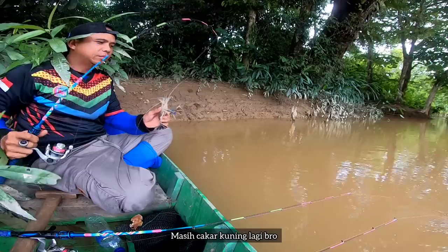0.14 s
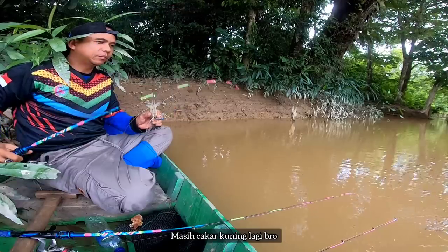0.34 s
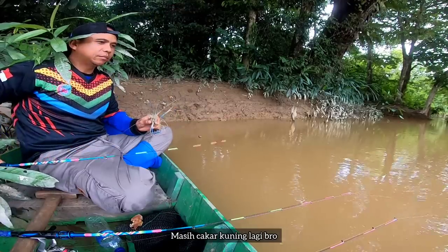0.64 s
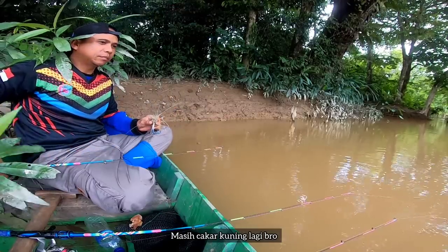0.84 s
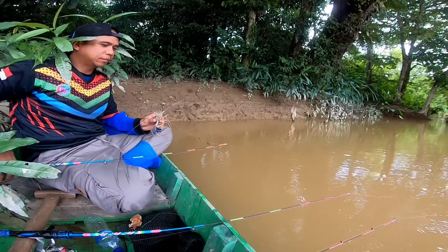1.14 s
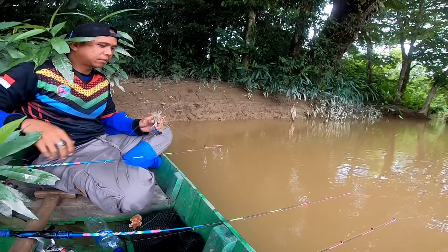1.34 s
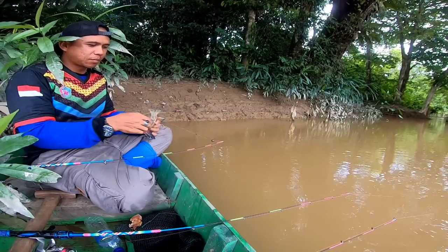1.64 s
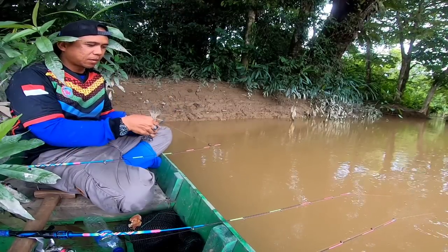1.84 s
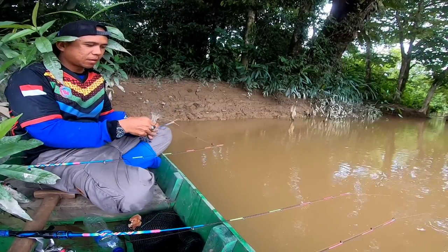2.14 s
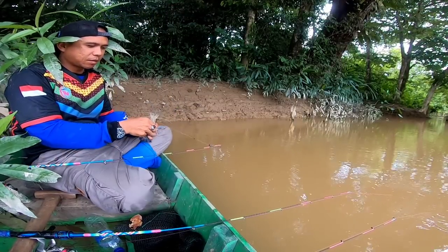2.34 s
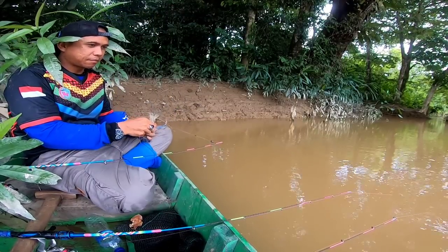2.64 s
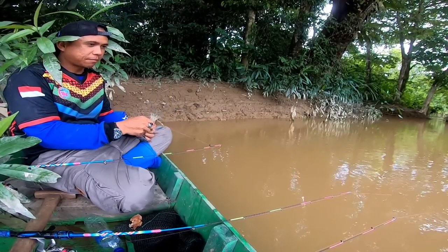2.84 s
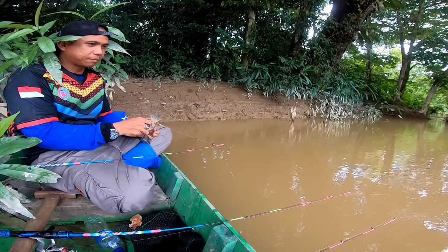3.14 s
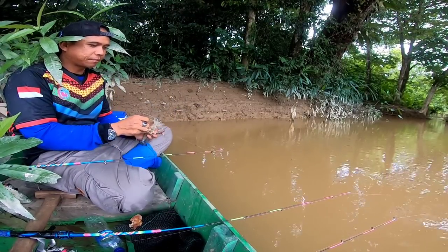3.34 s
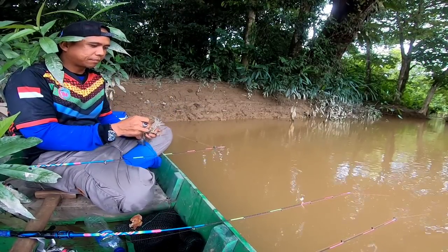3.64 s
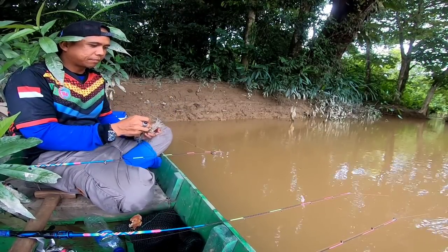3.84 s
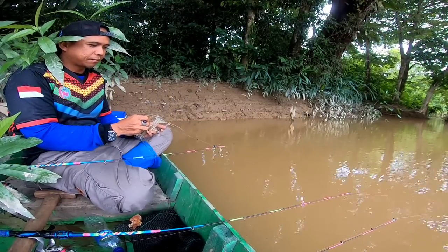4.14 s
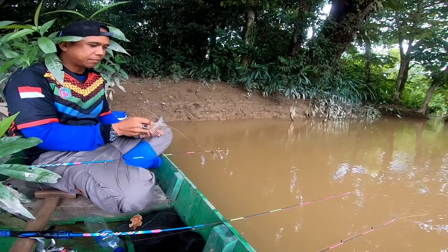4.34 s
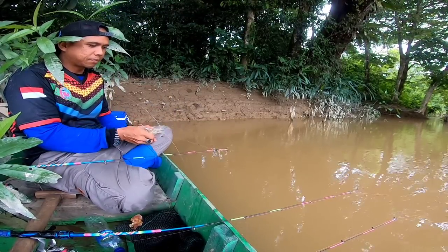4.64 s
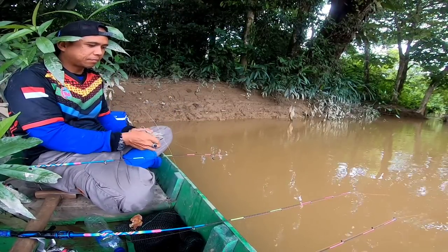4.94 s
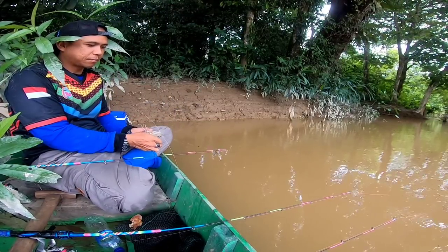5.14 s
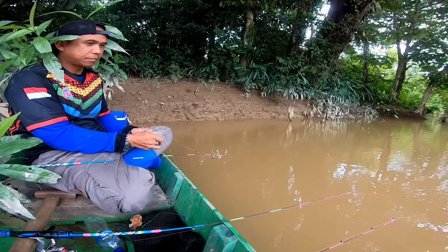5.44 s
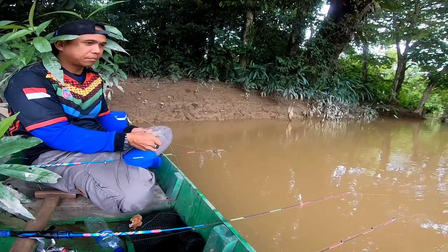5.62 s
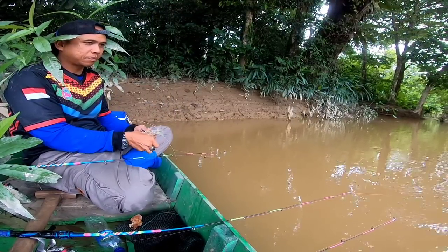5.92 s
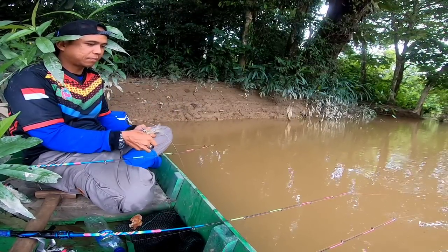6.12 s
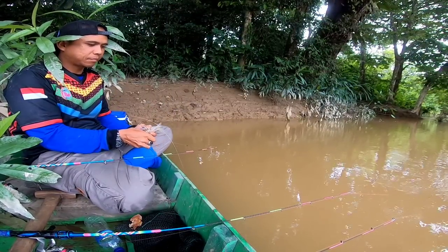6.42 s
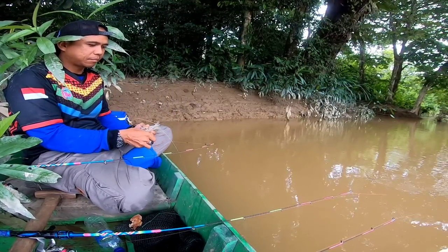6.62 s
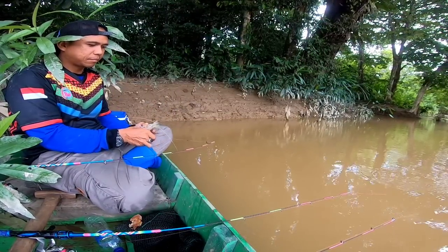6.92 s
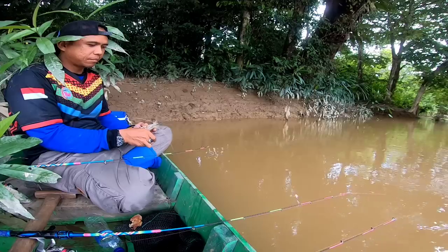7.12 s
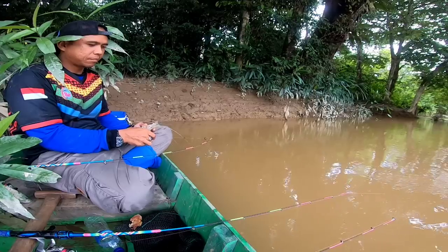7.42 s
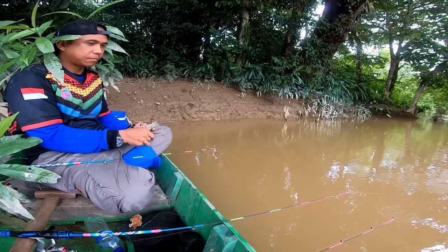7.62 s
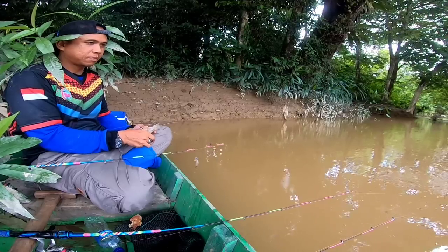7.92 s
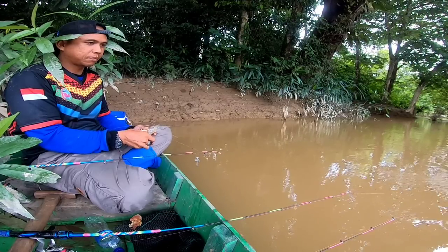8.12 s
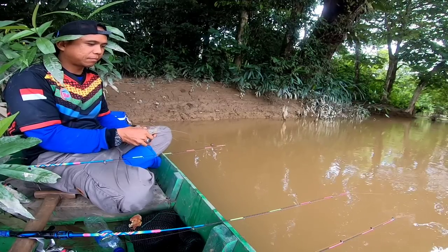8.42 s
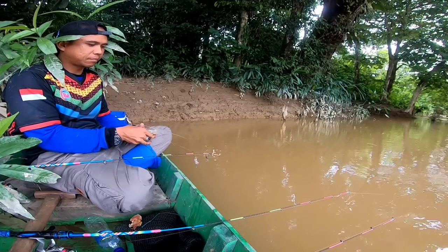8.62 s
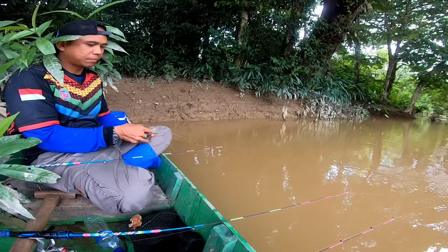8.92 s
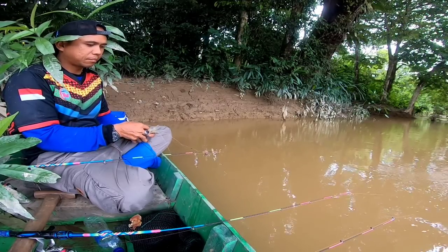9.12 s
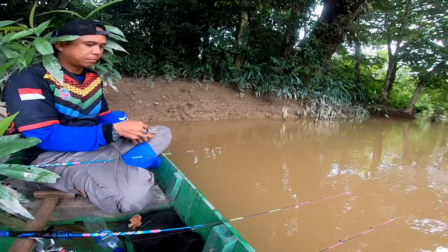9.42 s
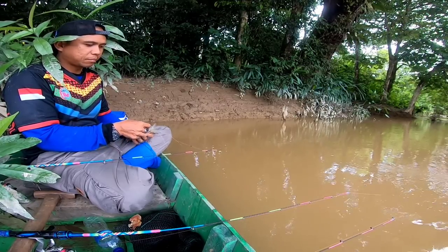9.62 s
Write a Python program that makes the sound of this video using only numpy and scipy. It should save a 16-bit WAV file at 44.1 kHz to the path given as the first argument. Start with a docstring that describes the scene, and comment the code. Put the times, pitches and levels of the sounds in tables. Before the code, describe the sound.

Outdoors on a small wooden boat at a forested riverbank, a stereo microphone close to the angler hears mostly insects: a dense high whine on the left, rapid double beats from one near cicada, and airy hiss phrases that swell and stop. Far away an engine putters as a low hum. Cloth rustling and a soft hollow hull knock come early, then quiet fidgeting, sparse clicks and two faint rising water drops.

```python
"""Cicadas drone to the left of a small wooden boat moored at a tropical riverbank: bands of noise for the
far chorus, throbbing double beats for the nearest one and swelling hiss for thin insect phrases. A far-off
single-cylinder boat engine hums along the river, built from the harmonics of its firings, over soft noise
of river and forest. An angler lays a rod down on the hull, which rings in damped modes, and handles bait
with faint noise rustles and clicks; the water plips twice in short rising notes."""
import sys
import numpy as np
from scipy import signal
from scipy.fft import rfft, irfft, next_fast_len
from scipy.io import wavfile
from scipy.ndimage import uniform_filter1d

SR = 44100
rng = np.random.default_rng(int(sys.argv[2]) if len(sys.argv) > 2 else 0)


def bounce(signal):
    """Save signal as a 16-bit WAV file at the path given by the first command-line argument."""
    frames = np.transpose(np.atleast_2d(signal))
    limited = np.clip(frames, -1, 1)
    pcm = np.round(limited * 32767).astype(np.int16)
    wavfile.write(sys.argv[1], SR, pcm)


N = 430857
T = np.arange(N) / SR  # seconds

# The two microphone ports. Each row: frequency in Hz, likeness of the two ports from 0 to 1,
# left lead in radians, how much louder the left is in dB.
PORTS = [(59.6, 0.54, 0.59, -3), (145, 1, 1.05, 0), (234, 0.8, 1.07, -1), (397, 0.66, 3.51, 1),
         (806, 0.86, 3.39, 0), (1910, 0.44, 4.03, -0.5), (3500, 0.72, 5.43, 0), (4260, 0.56, 5.45, 3),
         (5370, 0.5, 7.1, -1.5), (15100, 0, 8.4, 8.5)]


def gain_of(db):
    """Decibels to amplitude."""
    return 10 ** (np.asarray(db) / 20)


def evened(x):
    """Scales to rms 1."""
    return x / np.sqrt(np.mean(abs(x) ** 2) + 1e-30)


def curves(rows):
    """The columns of a time table, interpolated at every sample."""
    s, *columns = np.transpose(rows)
    return [np.interp(T, s, c) for c in columns]


def read(rows, hz, axis=1):
    """One column of a frequency table, interpolated on a log axis."""
    table = np.transpose(rows)
    return np.interp(np.log(hz + 1), np.log(table[0]), table[axis])


def add(mix, s, sound):
    """Adds a stereo sound at time s, cut at the end of the mix."""
    part = mix[:, round(s * SR):][:, :sound.shape[1]]
    part += sound[:, :part.shape[1]]


def flutter(spread_hz):
    """Complex random drift of rms 1 that changes at about the given rate."""
    s = np.arange(0, T[-1] + 1, 16 / SR)  # a coarse time grid is enough
    hz = np.fft.fftfreq(next_fast_len(len(s)), s[1])
    z = rng.standard_normal(len(hz)) + 1j * rng.standard_normal(len(hz))
    slow = np.fft.ifft(z * np.exp(-(hz / spread_hz / 2) ** 2))[:len(s)]
    return np.interp(T, s, evened(slow))


def wavering(depth_db, rate_hz):
    """Gain that wavers at random by an rms depth in dB."""
    return gain_of(depth_db * evened(flutter(rate_hz).real))


def port_noise(colour, size=N):
    """Noise with the spectrum colour(Hz) in dB per Hz, as the two ports hear it."""
    full = next_fast_len(size)
    hz = np.fft.rfftfreq(full, 1 / SR)
    a, b = rfft(rng.standard_normal((2, full))) * np.sqrt(SR / 2)
    same = np.clip(read(PORTS, hz), 0, 1)
    lean = gain_of(read(PORTS, hz, axis=3) / 2)
    right = same * a + np.sqrt(1 - same ** 2) * b
    right = right * np.exp(-1j * read(PORTS, hz, axis=2))
    return irfft(np.array([a * lean, right / lean]) * gain_of(colour(hz)), full)[:, :size]


def port_tone(z, hz):
    """A complex tone as the two ports hear it."""
    lean = gain_of(read(PORTS, hz, axis=3) / 2)
    right = z * np.exp(-1j * read(PORTS, hz, axis=2)) / lean
    return np.array([z * lean, right]).real


def chorus(shimmer_db=0.12):
    """Many far cicadas: their tymbal clicks merge into noise bands at the resonances of their bodies."""
    # Bands of the drone. Each row: centre in Hz, spread in Hz, left level in dB, right ear quieter by dB.
    bands = [(5206, 130, -69.5, 13), (5788, 120, -53, 11), (6055, 173, -44.5, 14.5), (6183, 102, -44, 20),
             (6533, 102, -47.5, 14), (7506, 274, -53, 18.5), (8500, 244, -58.5, 18), (12190, 280, -67, 4)]
    size = next_fast_len(N)
    hz, power = np.fft.rfftfreq(size, 1 / SR), 0
    for centre, spread, db, shade_db in bands:
        band = np.exp(-((hz - centre) / spread) ** 2 / 2)
        power = power + band / band.mean() * gain_of([[db], [db - shade_db]]) ** 2
    drone = irfft(rfft(rng.standard_normal((2, size))) * np.sqrt(power), size)[:, :N]
    return drone * wavering(shimmer_db, 7.6)


def near_cicada(beat_width=0.033, rasp_hz=110, whine_hz=20, uneven_db=1.1, shade_db=-15, scatter=1.0,
                octave_db=-27):
    """One cicada throbs in double beats: short rasping bursts over a narrow whine at its body resonance."""
    # The singer's drift. Each row: time in seconds, pitch in Hz, beat level in dB, whine level in dB.
    song = [(0, 6230, -37.5, -45), (.8, 6285, -37.5, -47), (2.3, 6295, -38, -44), (3.6, 6285, -36, -44.5),
            (4.5, 6250, -35.5, -44), (5.5, 6195, -34, -46.5), (6.6, 6195, -38.5, -45),
            (7.6, 6240, -40.5, -46), (8.6, 6170, -37, -47), (9.77, 6160, -38, -44)]
    # Pace of the throb. Each row: time in seconds, throbs per second.
    throb = [(0, 15.39), (2.5, 15.37), (3.2, 15.34), (4.2, 15.22), (6, 15.27), (7.2, 15.21), (9.77, 15.22)]
    # Where the two beats fall in a throb, in cycles.
    beat_places = (.11, .47)
    pitch, beat_db, whine_db = curves(song)
    cycles = np.cumsum(curves(throb)[0]) / SR
    beats = 0
    for place in beat_places:
        offset = (cycles - place + .5) % 1 - .5
        beats = beats + np.exp(-(offset / beat_width) ** 2 / 2)
    beats = beats * gain_of(beat_db) * wavering(uneven_db, 1.4)
    whine = gain_of(whine_db)
    rasp = flutter(rasp_hz)
    rasp = evened(rasp / np.hypot(1, abs(rasp)))  # the tymbal buckles with a limited force
    direct = beats * rasp + whine * flutter(whine_hz)
    scattered = beats * flutter(rasp_hz) + whine * flutter(whine_hz)  # by leaves, to the shaded ear
    shaded = gain_of(shade_db) * (direct + scatter * scattered) / np.hypot(1, scatter)
    turn = np.exp(2j * np.pi * np.cumsum(pitch) / SR)
    carrier = turn + gain_of(octave_db) * turn ** 2
    return np.sqrt(2) * (np.array([direct, shaded]) * carrier).real


def sizzle(level_db=7, bed_db=-81.5, swell_s=0.91, swell_db=17, break_s=.07):
    """A high, wide insect hiss: filtered noise in phrases that swell, hold and break off."""
    # Phrases, near and far. Each row: start in seconds, break-off in seconds, level in dB before level_db.
    phrases = [(0, 1.39, -79), (.6, 3.1, -79.5), (2.7, 4.48, -72.7), (3.4, 5.26, -79), (4.9, 6.5, -81),
               (5.8, 7.68, -71.5), (7.1, 9, -80), (8.35, 10, -72.3)]
    # Hiss colour. Each row: frequency in Hz, relative level in dB.
    hiss_colour = [(5000, -30), (7500, -13), (9500, 20.5), (11000, 15), (13500, 15), (15500, 8)]
    power = gain_of(bed_db) ** 2  # the farthest insects never pause
    for start, stop, db in phrases:
        swell = np.minimum((T - start) / swell_s, 1)
        gate = np.clip(np.minimum(T - start, stop + break_s - T) / break_s, 0, 1)
        power = power + (gate * gain_of(db - swell_db * (1 - swell))) ** 2
    hiss = evened(port_noise(lambda hz: read(hiss_colour, hz)))
    return hiss * gain_of(level_db) * np.sqrt(power)


def engine(level_db=-0.2, waver=0.2, boom_hz=195, bark_hz=235, diffuse=0.55, uneven_db=0.34,
           first_firing_s=.0082, step=512):
    """Firings as a sum of harmonics, coloured by bank echoes and a diffuse wash from the forest."""
    # Engine speed. Each row: time in seconds, firings per second.
    speed = [(0, 25.53), (1.8, 25.53), (2.8, 25.47), (4.5, 25.475), (5.3, 25.5), (6, 25.39), (7.5, 25.45),
             (8.6, 25.5), (9.77, 25.38)]
    # Loudness as the far boat moves along the bends.
    # Each row: time in seconds, relative exhaust boom in dB, relative exhaust bark in dB.
    loudness = [(0, -54.5, -80), (.27, -57, -59.5), (.7, -53.5, -55), (1.7, -51.5, -50.5), (2.8, -53, -49),
                (3.6, -54.5, -52), (4.85, -55, -52.5), (5.4, -53.5, -56), (5.85, -53, -68.5),
                (6.7, -55.5, -68.5), (7.8, -60.5, -64.5), (8.55, -59.5, -56), (9.25, -59, -59),
                (9.77, -56.5, -56.5)]
    # Exhaust colour. Each row: frequency in Hz, relative level in dB.
    exhaust = [(50, -44), (76, -33), (102, -29), (127, -14), (153, -0.5), (178, 1), (204, 1.3), (230, -0.5),
               (255, -0.5), (280, -3.5), (306, 0), (332, -8.5), (357, -34), (395, -16), (510, -25.5),
               (700, -47)]
    # Echoes off the banks. Each row: delay in seconds, signed strength before shelter and waver.
    bank_echoes = [(.0098, -0.3), (.02, -0.35), (0.0254, .22)]
    boom_db, bark_db = (c[::step] for c in curves(loudness))  # levels move on a coarse grid
    firing_gain = gain_of(level_db) * wavering(uneven_db, 12.0)[::step]
    rate = curves(speed)[0]
    turn = np.exp(2j * np.pi * (np.cumsum(rate) / SR - first_firing_s * rate[0]))
    shelter = gain_of(0.29 * (bark_db - bark_db.max()) + 3.0)  # behind a bend, bark and echoes fade together
    echoes = []
    for delay, strength in bank_echoes:
        echoes.append((delay, strength * shelter * (1 + waver * flutter(0.49)[::step])))
    out, harmonic = np.zeros((2, N)), turn
    for k in range(2, 24):  # the second harmonic is the lowest heard
        hz, harmonic = k * rate.mean(), harmonic * turn
        bright = np.interp(hz, [boom_hz, bark_hz], [0, 1])
        paths = 1 + sum(strength * np.exp(-2j * np.pi * hz * delay) for delay, strength in echoes)
        a, b = uniform_filter1d(rng.standard_normal((2, len(boom_db))), size=5)
        paths = paths + diffuse * hz / bark_hz * evened(a + 1j * b)  # short waves scatter more
        level = firing_gain * gain_of(read(exhaust, hz) + (1 - bright) * boom_db + bright * bark_db)
        out -= port_tone(np.interp(T, T[::step], level * paths) * harmonic, hz)
    return out


def air(swell_db=1.0):
    """The soft wash of river and forest: coloured noise with a gently wavering level."""
    # Each row: frequency in Hz, level in dB per Hz.
    wash_colour = [(20, -102), (42, -99), (60, -84.5), (85, -103), (150, -82.5), (330, -82.5), (450, -93),
                   (580, -93), (770, -84.5), (1030, -94.5), (1400, -94), (2500, -100.5), (5000, -106),
                   (15000, -115)]
    return port_noise(lambda hz: read(wash_colour, hz)) * wavering(swell_db, 5.9)


def rubbing(fidget_db=-62.5, settle_db_per_s=1.5, rise=0.13, fall=0.091, growth_db=6.5):
    """How hard cloth rubs: strokes set in, gather speed and stop (rise, fall: shares of their length)."""
    # Strokes of sleeve and line. Each row: start in seconds, length in seconds, level in dB.
    strokes = [(0.148, 0.37, -53.5), (.48, 0.405, -53.7), (0.85, 0.603, -55.5), (2.146, 0.55, -65),
               (3.604, 0.26, -61.5), (5.042, .25, -69), (7.864, .25, -67), (8.9, 0.51, -65)]
    power = gain_of(fidget_db - settle_db_per_s * T) ** 2  # faint rubbing dies away as the angler settles
    for start, length, db in strokes:
        u = np.clip((T - start) / length, 0, 1)
        contact = np.clip(np.minimum(u / rise, (1 - u) / fall), 0, 1)
        power = power + (contact * gain_of(db - growth_db * (1 - u))) ** 2
    return np.sqrt(power)


def handling(grain_db=3.0, grain_hz=110, click_slope_db=15):
    """Cloth rubs in clumped grains of noise; tackle gives short, dull clicks of decaying noise."""
    # Cloth colour. Each row: frequency in Hz, relative level in dB.
    cloth_colour = [(200, -10), (420, 7.5), (1400, 2), (3200, -1), (5000, -3.5), (10000, -12.5),
                    (15000, -27)]
    # Clicks and scuffs of tackle. Each row: time in seconds, level in dB, centre in Hz, t60 in seconds.
    tackle = [(.008, -52.5, 3820, .1), (.368, -49.5, 2590, .05), (0.458, -48, 3200, 0.067),
              (.806, -47, 4100, 0.04), (1.133, -44, 880, 0.12), (1.386, -43.5, 2770, 0.034),
              (1.561, -47, 2380, 0.039), (3.219, -54, 2780, 0.18), (3.261, -53.5, 3130, 0.13),
              (3.686, -57, 3900, 0.14), (5.079, -56, 1840, .16), (5.176, -58, 1910, 0.24),
              (7.888, -59, 1970, 0.13), (8.03, -59, 1990, .1), (8.8171, -43.5, 1860, 0.025),
              (8.893, -60, 2070, 0.059), (9.2844, -46.5, 1860, .04), (9.3498, -49, 2400, 0.033),
              (9.523, -55, 2920, 0.028)]
    cloth = evened(port_noise(lambda hz: read(cloth_colour, hz)))
    out = cloth * rubbing() * wavering(grain_db, grain_hz)
    t = T[:SR // 5]
    for s, db, centre, t60 in tackle:
        # the spectrum falls away on both sides of the centre, with octaves squared
        burst = port_noise(lambda hz: -click_slope_db * np.log2((hz + 1) / centre) ** 2, size=len(t))
        add(out, s, evened(burst) * gain_of(db - 60 * t / t60))
    return out


def hull(right_db=5.0, rise=0.0063):
    """Knocks ring the wooden hull's modes; a hard tap favours the upper ones, a soft blow the lowest."""
    # Each row: time in seconds, relative level in dB, softness of the blow in seconds.
    knocks = [(.838, -29.5, 0.0005), (.85, -32, 0.0027), (0.875, -23, 0.0048), (.903, -21, 0.0076),
              (7.648, -39.5, 0.00029), (7.692, -41, 0.00085)]
    # Hull modes at the two ports. Each row: Hz, relative level in dB, t60 in seconds, left lead in radians.
    modes = [(73.6, -13, 0.19, 2.5), (127, -10, 0.11, -2), (171, 4, 0.16, 3), (217.4, -2.5, 0.14, 1.2),
             (262.4, 3.5, 0.091, 2.2), (359, -9.5, 0.11, 1.5), (395, -15, 0.094, 1.5)]
    out, t = np.zeros((2, N)), T[:SR // 2]
    for s, level_db, soft in knocks:
        attack = 1 - np.exp(-(t / (rise + soft)) ** 2)
        for hz, db, t60, lead in modes:
            reach = np.tanh(10 * hz * soft) / (1 + (hz * soft) ** 4)  # how well the blow drives this mode
            ring = gain_of(level_db + db - 60 * t / t60) * attack * reach
            add(out, s, ring * np.sin(2 * np.pi * hz * t - np.array([[0], [lead]])))
    return out * gain_of([[0], [right_db]])


def plips(right_db=-2):
    """A bubble's note rises as it nears the surface: a short upward sine glide under a smooth hump."""
    # Each row: time in seconds, left level in dB, start in Hz, end in Hz, length in seconds.
    bubbles = [(4.407, -62, 520, 1000, .075), (5.997, -59, 816, 1070, 0.045)]
    out = np.zeros((2, N))
    for s, db, start_hz, end_hz, length in bubbles:
        hz = np.geomspace(start_hz, end_hz, int(length * SR))
        note = np.hanning(len(hz)) * np.sin(2 * np.pi * np.cumsum(hz) / SR)
        add(out, s, note * gain_of([[db], [db + right_db]]))
    return out


def scene():
    """Insects, engine and river around the small sounds in the boat."""
    insects = chorus() + near_cicada() + sizzle()
    river = engine() + air()
    return insects + river + handling() + hull() + plips()


def record(dry, edge_hz=15700):
    """The recorder's band limit: a steep low-pass."""
    lowpass = signal.firwin(511, edge_hz, window=("kaiser", 9), fs=SR)
    return signal.oaconvolve(dry, lowpass[None], "same")


dry = scene()
out = record(dry)
bounce(out)
```